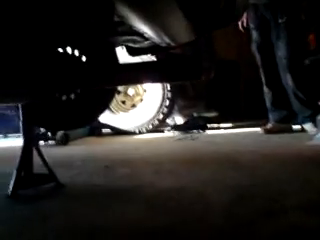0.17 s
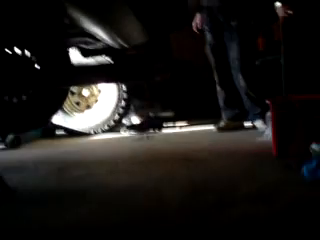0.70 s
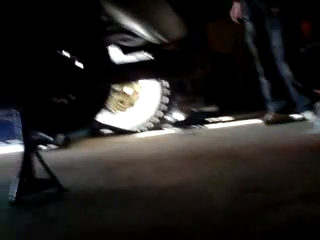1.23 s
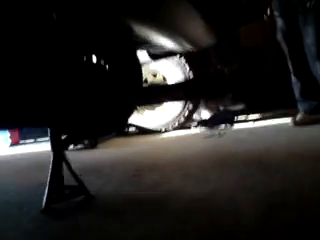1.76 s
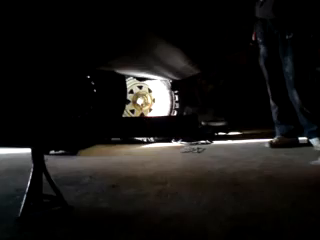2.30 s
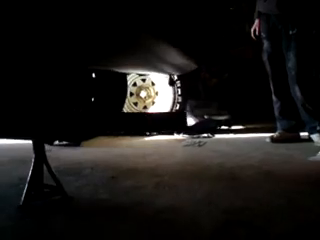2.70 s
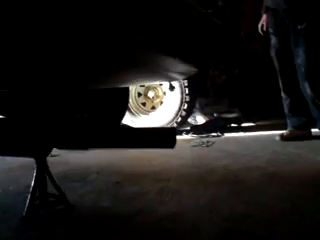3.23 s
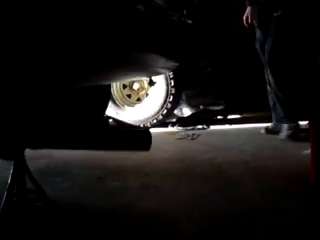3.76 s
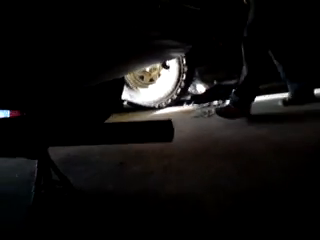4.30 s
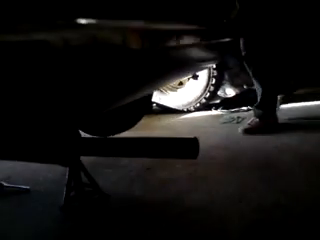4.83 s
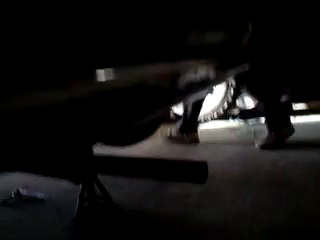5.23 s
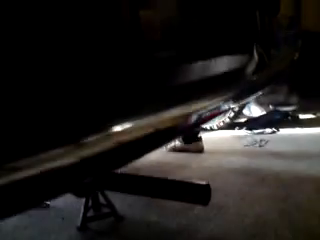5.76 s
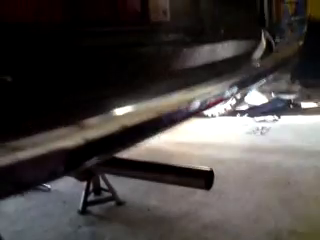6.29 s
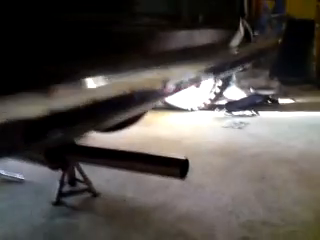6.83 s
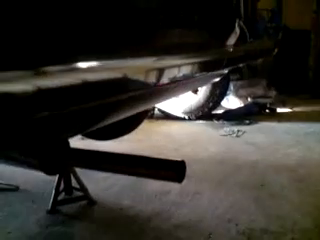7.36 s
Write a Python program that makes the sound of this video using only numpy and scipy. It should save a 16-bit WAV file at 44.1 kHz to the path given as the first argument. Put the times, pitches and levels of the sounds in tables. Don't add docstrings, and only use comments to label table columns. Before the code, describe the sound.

In a workshop, a small four-cylinder engine with a plain open exhaust barks in hard, uneven pairs. It revs in repeated blips, hissing and rattling, dips between them, then slows into a heavy lumpy idle. The handheld microphone moves from afar to right beside the pipe, overloading; near the end metal scrapes briefly across concrete.

```python
import sys
import numpy as np
from scipy import signal
from scipy.fft import rfft, irfft, next_fast_len
from scipy.io import wavfile
from scipy.ndimage import uniform_filter1d, minimum_filter1d

SR = 44100
rng = np.random.default_rng(int(sys.argv[2]) if len(sys.argv) > 2 else 0)


def volts(x):
    e = np.asarray(x, float) / 20
    return 10 ** e


def bounce(signal):
    frames = np.transpose(np.atleast_2d(signal))
    limited = np.clip(frames, -1, 1)
    pcm = np.round(limited * 32767).astype(np.int16)
    wavfile.write(sys.argv[1], SR, pcm)


N = 331191
LEAD = int(.2 * SR)

# time in seconds, four-stroke cycles per second.
CRANK_SPEED = [(0.0, 18.234), (0.088, 18.632), (0.366, 15.377), (0.702, 17.267), (0.913, 19.672),
               (1.369, 22.337), (1.681, 20.382), (2.134, 22.564), (2.569, 21.399), (2.956, 17.813),
               (3.324, 19.264), (3.54, 16.074), (4.037, 18.626), (4.398, 15.71), (5.163, 15.536),
               (5.849, 13.209), (6.869, 11.869), (7.52, 11.711)]
FIRING_POINTS = [
    0,
    .265,
    .52,
    .76,
]
# opens in seconds, shuts in seconds, load in dB on opening,
# load in dB on shutting, second cylinder in dB.
THROTTLE_OPENINGS = [(-.1, 0.094, 1.5, -1.5, -10.5), (0.448, 1.332, -1, -5.5, -6.5),
                     (1.3, 1.605, -6, -6, -9), (1.586, 1.913, -5, -4, -16.5), (1.94, 2.424, -6, -6, -9.5),
                     (2.435, 2.986, -5.5, -7, -8.5), (3.044, 3.257, -1, -2, -20),
                     (3.672, 4.043, -2, -1.5, -14), (4.3, 4.5, -11, -9, 1), (4.495, 5.218, -2, -1, 5.5),
                     (5.188, 6.225, 0.5, -0.5, 5), (6.237, 7.61, 4, -0.5, 15)]
LAYER_RESPONSE = {"thud": (-28.5, 0.83, 0.5, 1, 2), "boom": (-19.5, 1.77, 0.5, 3, 1),
                  "growl": (-29, 2.5, 0.18, -14, 0.2), "bark": (-48, 2, 1.84, -4, -5.3),
                  "cool": (-47, 2.24, -0.05, 5, 1.5), "hot": (-52, 4.5, 2, -14, 4),
                  "crack": (-48, 2.5, 1.9, 1.5, -5.5), "tail": (-50.5, 0.72, 1.58, -1, 1),
                  "soft": (-17.5, 4, 4.5, 5.5, 2), "rattle": (-31.5, 0.32, 0.66, 2.5, 0.16),
                  "puff": (-24.5, 2.5, 0.52, -8.5, -6.5)}
# centre in seconds, half length in seconds, change in dB, layer.
LAYER_SWELLS = [(0.483, 0.067, 6.5, "boom"), (2.86, 0.14, 7.5, "boom"), (0.94, 0.27, -4.5, "thud"),
                (3.378, 0.092, 0, "thud"), (5.81, 0.4, 5.5, "thud"), (6.55, 0.45, 1.5, "boom"),
                (2.09, 0.48, 10, "tail"), (2.35, 0.44, 3, "puff"), (2.81, 0.38, 3, "rattle"),
                (3.15, .12, -0.5, "puff"), (0.5, .1, -6, "crack"), (1.2, 0.12, 0, "growl"),
                (3.4, 0.13, -7, "bark"), (.47, 0.063, -15, "crack"), (0.39, 0.17, -6.5, "puff"),
                (0.38, 0.051, -14, "tail"), (0.5, 0.15, -6.5, "thud"), (0.22, 0.17, 2, "bark"),
                (.22, 0.097, 0, "hot"), (0.3, 0.17, 3, "growl"), (.62, .08, 15, "crack"),
                (3.9, 0.16, 10, "crack"), (3.4, 0.35, 1.5, "growl"), (5.6, .2, 4, "growl"),
                (0.96, 0.18, -8, "thud"), (2, 0.086, -4.5, "boom"), (1.6, 0.069, -6, "growl"),
                (3.6, 0.087, -3, "tail"), (1.4, 0.17, 5, "puff"), (5.5, 0.11, 3.5, "boom"),
                (5.95, .15, 2, "boom"), (5.7, 0.083, -1, "growl"), (4.3, 0.07, 1.5, "thud"),
                (1.85, .12, -0.5, "crack"), (6.9, 0.16, 2, "boom"), (7.2, 0.37, -2.5, "rattle")]

# frequency in Hz, width in Hz, then level in dB
THUD_MODES = [(35.5, 5.4, -21.5, -17.5, 7, 9.8), (43.7, 16, -8.5, -18, 7, 3.4),
              (63.6, 5.4, 13.5, 7.5, 6, 2.5), (73.16, 2.4, 6, -7.5, -2.5, 3)]
BOOM_MODES = [(92.9, 3.76, 6.2, 10, -2, 2.5), (107.95, 4.27, 0.5, 3.5, 6, 7),
              (116, 21.2, 2.6, -1.5, -41, -27.5)]
GROWL_MODES = [(141.5, 4, 16, 12, -7, -6), (173.5, 20.2, 10, 7.8, 29, 19),
               (203.1, 13.9, 18.5, 22.3, 16, 17), (231, 3.6, -1.5, 15, 15, 13.5)]
BARK_MODES = [(289, 19, 22.9, 27.5, 24, 24.4), (340.5, 8.7, 21.2, 27, 17.7, 18.4),
              (383.3, 14, 31.7, -1.5, 6.7, 9.9), (422, 7.2, 12, 5, 24, 25.3),
              (424, 9.1, 5.2, 4.5, 14.4, 12)]
CRACK_MODES = [(495, 17, 1.8, 2.5, -5, 2), (557.3, 33, 13.7, 18, 9.5, 6), (611, 28, 9.1, 7, 16.5, -7.5),
               (729, 21, 7.2, 2, 1, -11.5)]
TAILPIPE_MODES = [(827, 50, 4.9, 2.1, 14.3, 9.7), (950, 21, 1.1, 0.9, 1, 1)]
COOL_GAS_MODES = [(305.7, 22.4, 28.6, 29.7, 13.5, 12.6)]
HOT_GAS_MODES = [(334.6, 14, 34, 18, 5.9, 8), (359, 4.9, 6.1, 4.6, 3, 3)]
# time in seconds, index of the level column above.
MICROPHONE_PLACES = [
    (.85, 0),
    (1.05, 1),
    (2.85, 1),
    (3.0, 0),
    (4.25, 0),
    (4.35, 2),
    (5.4, 2),
    (6.2, 3),
]

# frequency in Hz, width in Hz, level in dB, polarity.
AFAR_MODES = [(35.0, 5.0, -23.9, 1), (59.6, 5.0, -36.0, -1), (81.2, 5.0, -29.7, -1), (99.0, 5.0, -21.7, 1),
              (100.8, 19.4, -22.4, -1), (124.2, 10.7, -28.5, 1), (189.0, 90.0, -36.3, -1),
              (208.7, 15.7, -22.2, 1), (232.1, 11.5, -31.5, 1), (283.3, 19.0, -31.6, 1),
              (308.1, 22.7, -29.3, 1), (353.8, 7.3, -38.5, -1), (379.3, 7.3, -37.2, 1),
              (437.0, 23.5, -44.5, -1)]
MOUTH_MODES = [(41, 34.1, -32.2, -1), (62.9, 10.1, -21.8, 1), (74.1, 37.5, -21.3, -1),
               (114.9, 6.7, -18.1, 1), (135.5, 7.5, -33.7, 1), (161, 9.9, -33.8, -1), (219.7, 25, -30.8, 1),
               (251.4, 5, -48.4, -1), (297.1, 19.9, -27.2, 1), (294.4, 23, -27.8, -1),
               (349.5, 20, -41.7, 1), (437.8, 9, -35, 1), (405, 12, -42, -1)]
WALKING_MODES = [(35.0, 11.6, -28.1, 1), (55.6, 5.2, -25.6, 1), (81.9, 11.4, -20.6, 1),
                 (87.4, 49.9, -18.0, -1), (113.8, 34.9, -19.2, 1), (125.8, 11.4, -25.6, -1),
                 (189.0, 82.8, -35.0, -1), (209.6, 42.6, -28.4, 1), (241.7, 6.7, -42.7, -1),
                 (284.1, 5.0, -49.9, 1), (324.5, 42.9, -47.0, 1), (381.8, 5.7, -47.6, 1),
                 (424.9, 35.1, -40.3, 1), (436.4, 46.6, -40.7, -1)]
BESIDE_MODES = [(36.8, 5.0, -31.9, -1), (58.3, 5.5, -27.4, -1), (71.8, 6.9, -27.6, -1),
                (102.6, 38.1, -24.0, -1), (106.7, 7.9, -14.9, 1), (128.1, 14.2, -27.2, 1),
                (184.0, 45.0, -30.8, 1), (214.0, 7.1, -28.5, -1), (236.1, 5.4, -32.4, -1),
                (277.5, 24.8, -43.9, 1), (319.8, 19.1, -47.2, -1), (365.9, 9.7, -45.1, -1),
                (419.8, 19.2, -33.2, -1), (425.3, 25.5, -36.8, 1)]
AFAR_PULSES = [(1.0, 0.0), (0.82, 0.001), (0.07, 0.002), (0.08, 0.015)]
MOUTH_PULSES = [(1.0, 0.0), (1.11, 0.003), (0.35, 0.015), (0.45, 0.037)]
WALKING_PULSES = [(1.0, 0.0), (0.9, -0.0), (0.31, 0.034), (0.55, 0.047)]
BESIDE_PULSES = [(1.0, 0.0), (1.19, 0.004), (0.23, 0.04), (0.48, 0.06)]
# lower limit in Hz, then gain in dB.
UPPER_MODES_HZ = [245, 245, 150, 245]
UPPER_MODES_DB = [1.5, 2, 4.2, 4.1]
# time in seconds, set (0 light load, 1 afar, 2 mouth, 3 walking, 4 beside).
RINGING_SET = [(.09, 1), (.11, 0), (.445, 0), (.462, 1), (.95, 1), (1.05, 0), (2.995, 0), (3.012, 1),
               (3.275, 1), (3.3, 0), (3.655, 0), (3.68, 1), (4.06, 1), (4.085, 0), (4.27, 0), (4.4, 2),
               (5.33, 2), (5.5, 3), (6.22, 3), (6.4, 4)]
# time in seconds, level in dB.
SHARP_PULSE_LEVEL = [(0, 4.2), (.47, 2.5), (.6, 4.5), (.8, 3), (3.03, -2), (3.075, 4), (3.25, 1.7),
                     (3.3, 0), (3.7, 1.6), (4.0, 4), (4.2, -9), (4.36, -6.5), (4.52, 1), (4.95, 1.8),
                     (5.3, 1.8), (5.6, 2), (5.9, 3), (6.25, 1), (6.6, 3.2), (7.5, 0.4)]

# frequency in Hz, density in dB per Hz.
VALVE_SPECTRUM = [(350, -5), (600, -4.5), (690, -9.5), (837, -9), (922, -7), (1020, -6), (1130, -8.5),
                  (1590, -11), (2220, -16), (3130, -13), (6160, -32.5), (7800, -44.5), (10100, -91.5),
                  (17200, -120)]
GAS_SPECTRUM = [(410, -15.5), (700, -1), (759, -15), (856, -3), (976, -25.5), (1100, -8.5), (2060, -19),
                (3850, -9.5), (6120, -34.5), (7800, -23), (10100, -71.5), (17200, -120)]
# centre in seconds, half length in seconds, frequency in Hz, width in Hz, level in dB.
JET_WHISTLES = [(1.82, 0.073, 2800, 430, -37.5), (1.97, 0.089, 3600, 350, -40.5),
                (2.6, 0.067, 3100, 400, -46.5), (2.36, 0.096, 1300, 130, -35),
                (3.88, 0.011, 2100, 200, -33), (1, .1, 2700, 410, -44), (1.15, .2, 1250, 310, -35),
                (4.3, 0.045, 900, 250, -48), (1.9, 0.095, 930, 260, -31), (6.02, 0.39, 465, 39, -34.5),
                (2.5, .012, 1050, 200, -22), (6.2, .15, 200, 38, -27), (3.87, .17, 420, 120, -28)]
# time in seconds, level in dB.
DRAG_LEVEL = [
    (6.05, -47),
    (6.16, -34),
    (6.3, -31.5),
    (6.46, -28.5),
    (6.62, -30.5),
    (6.772, -32.5),
    (6.83, -46),
    (6.9, -40),
]
# frequency in Hz, width in Hz, level in dB.
METAL_MODES = [(1125, 14, -2), (1206, 14, -8), (1340, 24, 1.5), (1530, 25, -9), (1805, 20, -10),
               (1954, 25, -11), (2340, 60, -13), (2595, 25, -12), (2934, 40, -10), (3020, 35, -6),
               (3214, 50, -5), (3490, 30, -7), (3704, 25, -12)]
# frequency in Hz, chance as a fraction.
BAND_LOSS = [(4500, 0), (5000, .07), (5500, .22), (5800, .04), (6400, .1), (6700, .05), (6870, .75),
             (7100, .15), (7600, .7), (8000, .12), (8500, .7)]


def rms_one(x):
    return x / np.sqrt(np.mean(x ** 2) + 1e-20)


def in_time(rows):
    s, *columns = np.transpose(rows)
    return [np.interp(np.arange(N) / SR, s, c) for c in columns]


def swell(centre_s, half_s):
    return np.exp(-((np.arange(N) / SR - centre_s) / half_s) ** 2)


def early(curve):
    return np.pad(curve, (LEAD, 0), mode="edge")


def lowpass(x, hz):
    return signal.sosfilt(signal.butter(2, min(hz, .4 * SR), fs=SR, output="sos"), x)


def resonate(x, modes):
    out = 0
    for hz, width, db in modes:
        r = np.exp(-np.pi * width / SR)
        zeros = [(1 - r * r) / 2, 0, (r * r - 1) / 2]
        poles = [1, -2 * r * np.cos(2 * np.pi * hz / SR), r * r]
        out = out + volts(db) * signal.lfilter(zeros, poles, x)
    return out


def even(x, span_s):
    size = int(span_s * SR)
    return x / np.sqrt(uniform_filter1d(uniform_filter1d(x ** 2, size), size) + 1e-12)


def coloured(spectrum):
    hz, db = np.transpose(spectrum)
    grid = np.fft.rfftfreq(N, 1 / SR) + 1
    shape = volts(np.interp(np.log(grid), np.log(hz), db, -60, -90))
    return rms_one(irfft(rfft(rng.standard_normal(N)) * shape, N))


def crank():
    flywheel_s = .1
    return uniform_filter1d(in_time(CRANK_SPEED)[0], int(flywheel_s * SR), mode="nearest")


def firings(jitter_s, spread_db):
    cycle = np.cumsum(early(crank())) / SR
    cycle += .05 - cycle[LEAD]
    turns = np.arange(int(cycle[0]) - 1, int(cycle[-1]) + 1)
    chance = rng.standard_normal((len(turns), 8))
    size = N + LEAD
    trains = np.full((4, size), 1e-18)
    for k, point in enumerate(FIRING_POINTS):
        at = np.interp(turns + point, cycle, np.arange(size), 0, size - 1)
        at = at + jitter_s * SR * chance[:, k]
        trains[k, np.clip(at, 0, size - 1).astype(int)] = volts(spread_db * chance[:, 4 + k])
    trains[:, :20] = trains[:, -20:] = 0
    return trains


def throttle():
    opening_db_per_s, closing_db_per_s, balance_s = 109.5, 136, 0.0083
    t = np.arange(N) / SR
    load_db = np.full(N, -8.)
    second_db = np.full(N, -2.)
    for opens, shuts, first_db, last_db, balance_db in THROTTLE_OPENINGS:
        db = np.interp(t, [opens, shuts], [first_db, last_db])
        db -= opening_db_per_s * np.maximum(opens - t, 0)
        db -= closing_db_per_s * np.maximum(t - shuts, 0)
        second_db = np.where(db > load_db, balance_db, second_db)
        load_db = np.maximum(db, load_db)
    return load_db, uniform_filter1d(second_db, int(balance_s * SR))


def nearness():
    step_closer_s = 4.3
    return np.clip((np.arange(N) / SR - step_closer_s) / .1 + .5, 0, 1)


def layer_levels():
    usual_speed = 18
    full_overrun = 0.43
    load_db, second_db = throttle()
    speed, near = crank(), nearness()
    overrun = np.clip(-np.gradient(speed) * SR / full_overrun, 0, 1)
    layer_db = {"second": second_db}
    for layer, (db, share, db_per_cycle, near_db, overrun_db) in LAYER_RESPONSE.items():
        engine_db = db + share * load_db + db_per_cycle * (speed - usual_speed)
        layer_db[layer] = engine_db + near_db * near + overrun_db * overrun
    for s, half_s, db, layer in LAYER_SWELLS:
        layer_db[layer] += db * swell(s, half_s)
    return layer_db


def pipe(x, modes):
    s, place = np.transpose(MICROPHONE_PLACES)
    shares = [np.interp(np.arange(N) / SR, s, place == k) for k in range(4)]
    mixes = np.zeros((4, N))
    for hz, width, *place_db in modes:
        mixes += volts(np.array(place_db))[:, None] * resonate(x, [(hz, width, 0)])[LEAD:]
    return np.sum(shares * mixes, axis=0)


def heard(place):
    s, places = np.transpose(RINGING_SET)
    return np.interp(np.arange(N) / SR, s, places == place)


def close_pipe(trains):
    # modes, cylinders, cycles per s there, s early
    places = [(AFAR_MODES, AFAR_PULSES, 18, .0012), (MOUTH_MODES, MOUTH_PULSES, 15.5, -.0006),
              (WALKING_MODES, WALKING_PULSES, 13.3, -.0005), (BESIDE_MODES, BESIDE_PULSES, 12, .0007)]
    out = 0
    for k, (modes, cylinders, speed, early_s) in enumerate(places):
        pulses = 0
        for train, (strength, cycles) in zip(trains, cylinders):
            pulses = pulses + strength * np.roll(train, -int((cycles / speed + early_s) * SR))
        ring = 0
        for hz, width, db, polarity in modes:
            bite_db = UPPER_MODES_DB[k] * (hz > UPPER_MODES_HZ[k])
            ring = ring + polarity * resonate(pulses, [(hz, width, db + bite_db)])
        out = out + heard(k + 1) * ring[LEAD:]
    return volts(63.3 + in_time(SHARP_PULSE_LEVEL)[0]) * lowpass(out, 1600)


def exhaust(trains, layer_db):
    second_db = early(layer_db["second"])
    soft = volts(early(layer_db["soft"])) * lowpass(trains[2] + volts(-1.0) * trains[3], hz=368)
    wall = volts(-5) * swell(5.53, .2)
    groups = [("thud", THUD_MODES, 110, 1.01), ("boom", BOOM_MODES, 170, 1.01),
              ("growl", GROWL_MODES, 330, .8), ("bark", BARK_MODES, 650, .35),
              ("cool", COOL_GAS_MODES, 650, .35), ("hot", HOT_GAS_MODES, 650, .35),
              ("crack", CRACK_MODES, 700, .25), ("tail", TAILPIPE_MODES, 1100, .35)]
    out = 0
    for layer, modes, front_hz, share in groups:
        pulses = trains[0] + volts(share * second_db) * trains[1] + soft
        ring = pipe(lowpass(pulses, front_hz), modes)
        if modes[0][0] < 450:
            ring = ring * (heard(0) + (layer == "thud") * wall)
        out = out + volts(layer_db[layer]) * ring
    gap = out - resonate(out, [(453, 226, -6.5), (240, 4.5, -4.5)])
    placed = gap + nearness() * (out - gap)
    return -volts(64.0) * placed + close_pipe(trains)


def jet_whistles(gate):
    noise = rng.standard_normal(N)
    out = 0
    for s, half_s, hz, width, db in JET_WHISTLES:
        out = out + volts(db) * swell(s, half_s) * rms_one(resonate(noise, [(hz, width, 0)]))
    return gate * out


def hiss(trains, layer_db):
    echo_s, decay_s = 0.0083, 0.01
    echo = np.roll(trains[0] + trains[1], int(echo_s * SR))
    blows = volts(1.3) * trains[0] + trains[1] + 0.089 * echo
    gate = rms_one(signal.lfilter([1], [1, -np.exp(-1 / (decay_s * SR))], lowpass(blows, hz=500)))
    flutter = volts(0.25 * rms_one(lowpass(rng.standard_normal(N), hz=40.3)))
    rattle = volts(layer_db["rattle"] + 2.0) * flutter * coloured(VALVE_SPECTRUM)
    puffs = volts(layer_db["puff"] - 2.0) * gate * coloured(GAS_SPECTRUM)
    return rattle + puffs + jet_whistles(gate)


def rumble():
    return volts(-42) * coloured([(25, -17.0), (60, -29.0), (200, 16.5), (500, -2.0), (700, -28.5)])


def drag():
    grains_per_s = 2500
    hits = rng.random(N) < grains_per_s / SR
    grains = rng.standard_normal(N) * hits * volts(2.0 * rng.exponential(1, N))
    scrape = signal.sosfilt(signal.butter(2, [1000, 4200], "band", fs=SR, output="sos"), grains)
    metal = rms_one(resonate(grains, METAL_MODES)) + .9 * rms_one(scrape)
    dull = lowpass(lowpass(metal, hz=4240), hz=4240)
    before, after = (DRAG_LEVEL[0][0] - .03, -70), (DRAG_LEVEL[-1][0] + 0.013, -70)
    level_db = in_time([before] + list(DRAG_LEVEL) + [after])[0]
    return volts(level_db + 2.0) * even(dull, 0.11)


def workshop(x):
    size = next_fast_len(N + SR)
    hz = np.fft.rfftfreq(size, 1 / SR)
    t60 = .3 / (1 + hz / 3000)
    echoes = 0
    for k, lag in enumerate(rng.uniform(0.022, 0.065, 8)):
        loop = volts(-60 * lag / t60) * np.exp(-2j * np.pi * hz * lag)
        echoes = echoes + (-1) ** k * loop / (1 - loop)
    above_bass = hz ** 2 / (hz ** 2 + 300 ** 2)
    return irfft(rfft(x, size) * echoes * above_bass, size)[:N]


def scene():
    trains = firings(jitter_s=.00006, spread_db=.7)
    layer_db = layer_levels()
    noises = hiss(trains[:, LEAD:], layer_db) + drag()
    pulses = exhaust(trains, layer_db)
    reverberation = volts(-15) * workshop(noises + volts(-8) * pulses)
    return (pulses + rumble() + noises + reverberation)[None]


def dropouts(x):
    hz, _, cells = signal.stft(x, SR, nperseg=1024)
    band, slot = np.arange(len(hz)) // 3, np.arange(cells.shape[-1]) // 4
    draws = minimum_filter1d(rng.random((band[-1] + 1, slot[-1] + 1)), size=2)
    lost = draws[band][:, slot] < np.interp(hz, *np.transpose(BAND_LOSS))[:, None] / 2
    return signal.istft(cells * np.where(lost, volts(-24), 1), SR)[1][:, :N]


def roll_off(x):
    return signal.sosfilt(signal.butter(12, 9020, fs=SR, output="sos"), x)


def record(dry):
    overload, headroom_db_per_db, loud_db, memory_s = .41, .55, -15.5, .07
    keep = np.exp(-1 / (memory_s * SR))
    power = np.minimum(dry ** 2, overload ** 2)
    recent = signal.lfilter([1 - keep], [1, -keep], power, zi=[[volts(2 * loud_db)]])[0]
    headroom_db = np.clip(headroom_db_per_db * (loud_db - 10 * np.log10(recent)), 0, 3)
    top = overload * volts(headroom_db)
    flat = dry / (1 + np.abs(dry / top) ** 8) ** (1 / 8)
    edge = signal.ellip(8, .5, 70, 6750, fs=SR, output="sos")
    cut = signal.sosfilt(edge, flat, zi=overload * signal.sosfilt_zi(edge)[:, None])[0]
    shelf = signal.sosfilt(signal.butter(6, [6900, 7500], "band", fs=SR, output="sos"), flat)
    bass = lowpass(lowpass(cut, hz=200), hz=200)
    image = volts(-53) * bass * np.cos(2 * np.pi * 8000 * np.arange(N) / SR)
    mix = dropouts(cut + volts(-12.5) * shelf + image)
    return roll_off(mix)


dry = scene()
out = record(dry)
bounce(out)
```